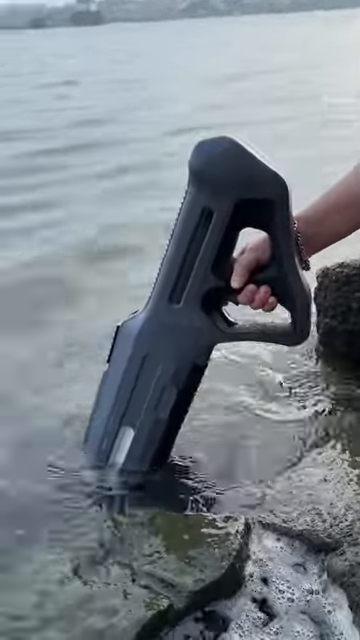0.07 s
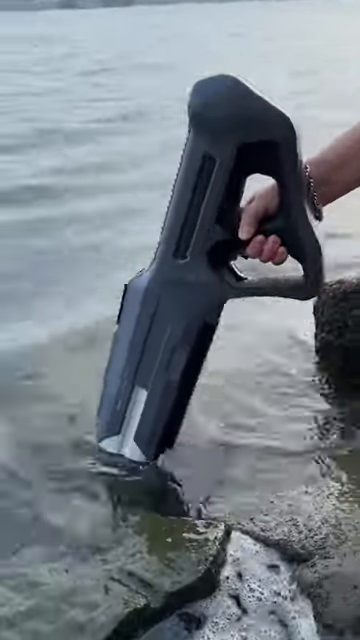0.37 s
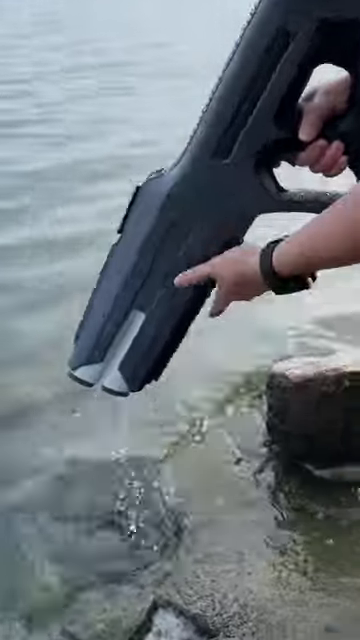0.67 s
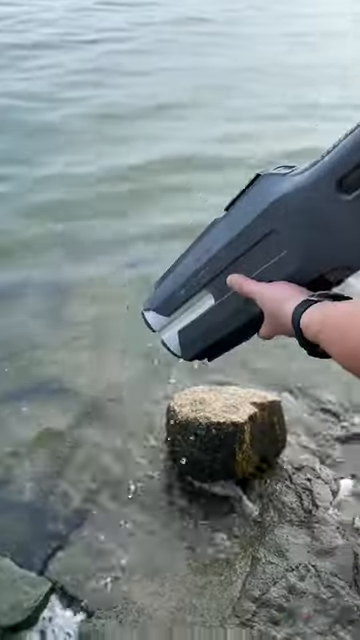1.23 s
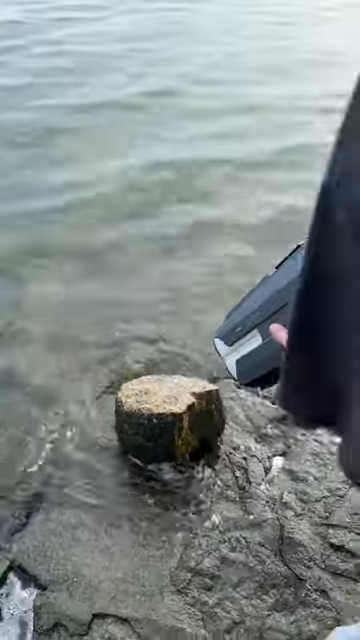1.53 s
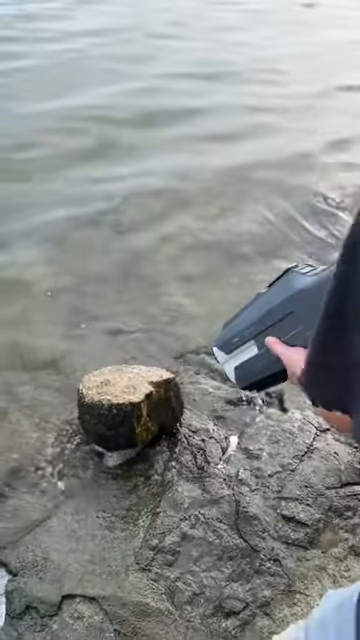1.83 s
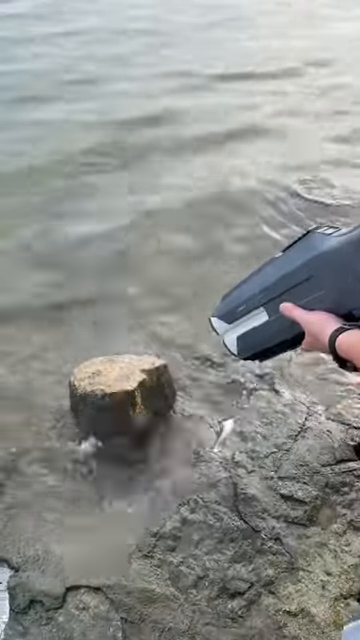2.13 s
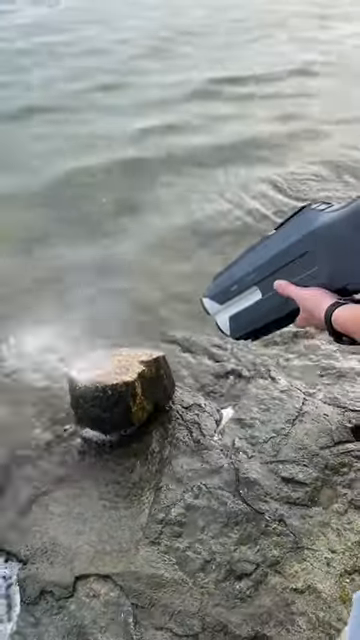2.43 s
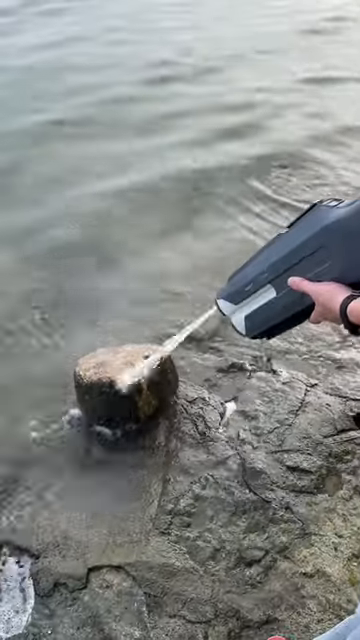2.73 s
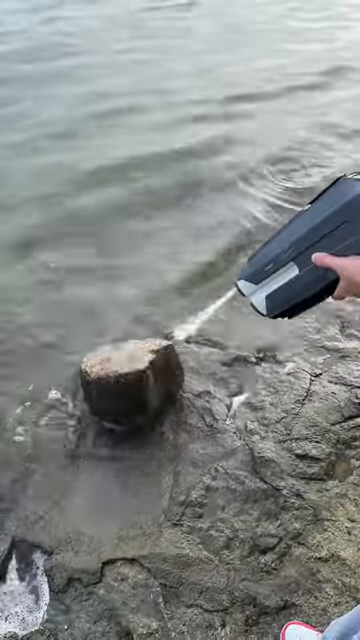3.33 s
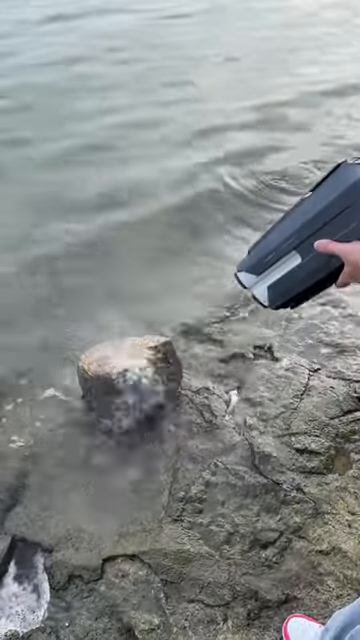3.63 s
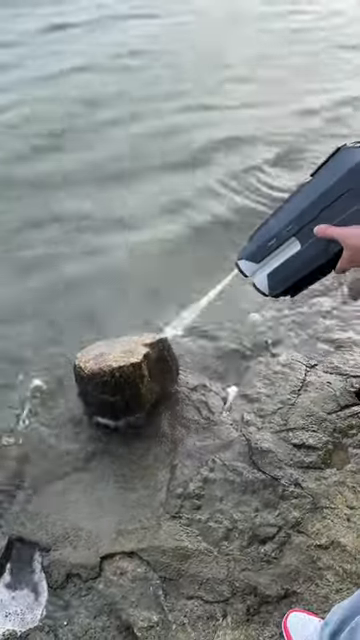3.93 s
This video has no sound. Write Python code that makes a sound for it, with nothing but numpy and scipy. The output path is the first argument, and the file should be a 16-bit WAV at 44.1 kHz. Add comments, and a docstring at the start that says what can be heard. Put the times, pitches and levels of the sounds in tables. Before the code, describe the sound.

A motorised toy water gun fires a rapid run of hollow plastic knocks and hissing jets that spatter on stone. Before that, it drips and gurgles out of a lake. Small waves lap and wind rumbles on the close microphone.

```python
"""A motorised toy water gun fires 17 quick shots at a rock, after being lifted dripping out of a lake.
In each shot the piston knocks twice in the hollow plastic body, a jet hisses and spatters on stone,
and the piston returns with a duller thud. Thrown water plops into the shallows.
All along, small waves full of bubbles lap and a breeze rumbles on the microphone."""
import sys
import numpy as np
from scipy import signal
from scipy.fft import rfft, irfft
from scipy.io import wavfile
from scipy.ndimage import uniform_filter1d

SR = 44100
rng = np.random.default_rng(int(sys.argv[2]) if len(sys.argv) > 2 else 0)


def store_pcm(level_fs):
    """Save levels as 16-bit WAV."""
    pcm = np.round(np.clip(level_fs, -1, 1) * 32767).astype(np.int16)
    wavfile.write(sys.argv[1], SR, np.atleast_2d(pcm).T)


N = 176400
CLOCK = np.arange(N) / SR  # seconds into the scene
T = np.arange(SR // 3) / SR  # seconds into one event


def amp(db):
    """Turns decibels into a gain."""
    return 10 ** (np.asarray(db) / 20)


def unit(x):
    """Scales a signal to an average power of 1."""
    return x / np.sqrt(np.mean(x ** 2) + 1e-20)


def read(points, hz):
    """Looks up a table along a log frequency scale."""
    f, value = np.transpose(points)
    return np.interp(np.log(hz + 1), np.log(f + 1), value)


def fall(t, t60, hold_s=0):
    """Silent before t = 0, steady for hold_s, then fading by 60 dB every t60 seconds."""
    return (t >= 0) * np.exp(-np.log(1000) * np.maximum(t - hold_s, 0) / t60)


def rise(seconds):
    """Fades an event in along a straight line."""
    return np.minimum(T / seconds, 1)


def add(mix, s, sound):
    """Mixes a sound in, starting at s seconds."""
    part = mix[..., round(s * SR):][..., :sound.shape[-1]]
    part += sound[..., :part.shape[-1]]


def noise(size=N):
    """White noise for two channels."""
    return rng.standard_normal((2, size))


def colour(x, spectrum):
    """Gives a sound the tone colour in a table; white noise keeps its power."""
    gain = unit(amp(read(spectrum, abs(np.fft.fftfreq(4096, 1 / SR)))))
    taps = np.fft.ifft(np.exp(np.conj(signal.hilbert(np.log(gain))))).real[:2048]  # rings only afterwards
    return signal.oaconvolve(x, taps[None], axes=1)[:, :N]


def drops(per_s, spread_db):
    """Tiny drops land as random clicks; spread_db makes their sizes uneven."""
    sizes = amp(spread_db * np.minimum(rng.exponential(1, (2, N)), 4))
    return unit(np.sign(noise()) * sizes * (rng.random((2, N)) < per_s / SR))


def patchy(x, depth_db, width_hz, length_s):
    """Lets random bands of a sound swell and fade."""
    hz, t, spectra = signal.stft(x, SR, nperseg=512, noverlap=384)
    across = np.fft.fftfreq(len(hz), hz[1])[:, None] * width_hz
    along = np.fft.fftfreq(len(t), t[1]) * length_s
    blur = np.exp(-2 * (across ** 2 + along ** 2))
    patches = unit(np.fft.ifft2(np.fft.fft2(rng.standard_normal(spectra.shape[1:])) * blur).real)
    return unit(signal.istft(spectra * amp(depth_db * patches), SR, nperseg=512, noverlap=384)[1][:, :N])


def bubble_tone(hz, t, glide_per_s):
    """A bubble's note, climbing by glide_per_s times its starting pitch each second."""
    return np.sin(2 * np.pi * hz * t * (1 + glide_per_s * t / 2))


# How loud the water is: t/s, lapping level/dB, trickle level/dB
WATER_LEVELS = [(0.0, -31, -49), (0.17, -41, -70), (0.406, -44, -57.5), (0.704, -38, -48),
                (0.798, -38.5, -58), (0.864, -33.5, -37), (0.9, -30, -31.5), (0.926, -31.5, -43),
                (1.4, -43.5, -46), (1.654, -41, -48.5), (1.694, -43, -40.5), (1.85, -34, -45.5)]
# Tone colour of lapping water: f/Hz, level/dB
LAP_COLOUR = [(60, -39.5), (230, -53), (400, -3), (600, -3.5), (950, -2.5), (1500, -5.5), (2100, -13.5),
              (4000, -18), (9000, -23.5), (15000, -36)]
# Tone colour of trickling water: f/Hz, level/dB
TRICKLE_COLOUR = [(150, -47), (500, -11), (2000, -10), (3500, 0), (6500, -3.5), (9000, 2.5), (11000, -5),
                  (14500, -1)]


def waves_and_trickle(bubbles_per_s=700, ring_cycles=6.5, gain_db=-1.5):
    """Small waves fizz with ringing bubbles while a fine trickle runs off the gun."""
    bubbles = np.zeros((2, N))
    t = T[:len(T) // 8]
    for when, pitch, size, pan in rng.random((int(bubbles_per_s * N / SR), 4)):
        hz = 350 + 2600 * pitch
        fade = np.exp(-t * hz / ring_cycles) * (1 - t / t[-1])
        bubble = amp(8.5 * size ** 2) * fade * bubble_tone(hz, t, glide_per_s=7)
        add(bubbles, when * N / SR, np.array([[pan], [1 - pan]]) * bubble)
    lap = unit(colour(unit(bubbles) + amp(6) * noise(), LAP_COLOUR))
    droplets = patchy(drops(per_s=160, spread_db=3), depth_db=3, width_hz=1400, length_s=0.0072)
    trickle = colour(droplets + amp(-6.5) * noise(), TRICKLE_COLOUR)
    s, lap_db, trickle_db = np.transpose(WATER_LEVELS)
    lap *= amp(np.interp(CLOCK, s, lap_db))
    trickle *= amp(np.interp(CLOCK, s, trickle_db))
    return amp(gain_db) * (lap + trickle)


# Gusts of the breeze: t/s, level/dB, wind filter cut-off f/Hz
GUSTS = [(0, -37, 124), (.3, -36, 112), (.55, -36.5, 98), (.9, -36, 129), (1.2, -36, 144),
         (1.3, -32.5, 156), (1.38, -42, 259), (1.6, -37, 297), (1.71, -37, 436), (1.86, -40.5, 437),
         (1.95, -33, 273), (2.15, -34, 262), (2.4, -23.5, 204), (2.9, -33, 255), (3.25, -26, 153),
         (3.6, -28.5, 201), (3.85, -17.5, 191), (4, -18, 174)]


def breeze(top_ratio=2.24, lump_db=3.5):
    """Lumpy wind rumble, its bass cut by the recorder's moving wind filter."""
    hz, t, spectra = signal.stft(noise(), SR, nperseg=2048, noverlap=1536)
    s, db, cutoff_hz = np.transpose(GUSTS)
    octaves = np.log2((hz[:, None] + 1) / np.interp(t, s, cutoff_hz))
    below_db = np.clip(72 * octaves, -34, 0)  # a steep cut that leaves a little deep bass
    above_db = -12.5 * np.maximum(octaves - np.log2(top_ratio), 0)
    gain = amp(below_db + above_db)
    gain /= np.linalg.norm(gain, axis=0)
    rumble = signal.istft(spectra * gain, SR, nperseg=2048, noverlap=1536)[1][:, :N]
    lumps = unit(uniform_filter1d(uniform_filter1d(noise()[0], size=900), size=600))
    return unit(rumble * amp(lump_db * lumps)) * amp(np.interp(CLOCK, s, db))


WATER_RISE_S = 0.0017
# Single bubbles: t/s, level/dB, starting f/Hz, fade time/s
GULP_BUBBLES = [(.219, -27, 232, 0.094), (.52, -21, 180, 0.066), (.772, -23, 600, 0.081),
                (0.832, -24.5, 2030, 0.024), (.898, -13, 389, 0.036), (0.899, -38, 914, .04),
                (1.008, -25, 894, 0.045), (1.092, -21, 258, 0.052), (1.115, -18, 333, 0.034),
                (1.175, -16, 263, .05), (1.268, -19, 320, 0.039), (1.278, -23.5, 515, .04),
                (1.695, -47, 486, .05), (1.803, -31, 536, 0.15), (1.86, -19.5, 1450, 0.023)]


def gulps():
    """Bubbles gulp with a rising note as the gun leaves the water."""
    out = np.zeros((2, N))
    for s, db, hz, t60 in GULP_BUBBLES:
        shape = rise(WATER_RISE_S) * fall(T, t60, hold_s=WATER_RISE_S)
        add(out, s, amp(db) * shape * bubble_tone(hz, T, glide_per_s=3.5))
    return out


# Drips off the gun: t/s, level/dB, f/Hz
GUN_DRIPS = [(0.259, -39, 3560), (.5237, -28.5, 3370), (0.6536, -30, 3260), (.6878, -34, 8860),
             (0.8952, -18.5, 2520), (1.0091, -27.5, 9150), (1.2241, -26.5, 3940), (1.281, -43, 2980),
             (1.3245, -20.5, 8260), (1.3456, -33, 8000), (1.4114, -25.5, 7860), (1.478, -23.5, 5650),
             (1.6213, -36, 7100), (1.6413, -29, 8550), (1.785, -25.5, 4070)]


def drips():
    """Each drip hits stone or water with a tiny ping and a noisy tick."""
    pings, ticks = np.zeros((2, N)), np.zeros(N)
    for s, db, hz in GUN_DRIPS:
        add(pings, s, amp(db - 3.5) * fall(T, t60=0.012) * np.sin(2 * np.pi * hz * T))
        add(ticks, s, amp(db - 6) * fall(T, t60=0.024))
    return pings + colour(ticks * noise(), TRICKLE_COLOUR)


# Sloshes and scuffs: t/s, level/dB, fade time/s
HANDLING = [(.897, -21, 0.031), (1.69, -25.5, 0.14), (1.862, -28.5, 0.087), (1.881, -22, 0.021)]


def scuffs():
    """The wet gun shifts in the hands with short puffs of noise."""
    puffs = np.zeros(N)
    for s, db, t60 in HANDLING:
        add(puffs, s, amp(db) * rise(WATER_RISE_S) * fall(T, t60, hold_s=WATER_RISE_S))
    return colour(puffs * noise(), LAP_COLOUR)


RELEASE, SLAM, RETURN = range(3)  # the piston's three blows
# Notes of the plastic body: f/Hz, fade time/s, then level/dB at release, slam and return
BODY_NOTES = [(552, 0.059, -41, -49, -9.5), (820, 0.023, -18, -20, -9), (990, 0.038, -18, -16, -22),
              (1394, 0.054, -19, -14.5, -26), (1523, 0.023, -31, -6.5, -20), (1765, 0.033, -25.5, -15, -27),
              (2211, 0.012, -17.5, -36.5, -10.5), (2650, 0.044, -20, -32, -48),
              (3986, 0.015, -13.5, -16, -13)]


def body_ring(blow, detune=0.027, spread_rad=0.76):
    """A blow sets the hollow body ringing, tuned a little differently each time."""
    out = np.zeros((2, len(T)))
    for hz, t60, *levels_db in BODY_NOTES:
        tune, side = rng.standard_normal(2)
        phase = 2 * np.pi * hz * (1 + detune * tune) * T + spread_rad * side * np.array([[1], [-1]])
        out += rng.choice([-1, 1]) * amp(levels_db[blow]) * fall(T, t60) * np.sin(phase)
    return out


def chamber_thump(hz, wobble=0.098, wobble_s=0.002, settle_s=0.0016):
    """The water chamber booms, settling in pitch and wobbling as the water inside shifts."""
    pitch_wobble, level_wobble = wobble * unit(uniform_filter1d(noise(len(T)), int(wobble_s * SR)))
    pitch_hz = hz * (1 + 0.21 * np.exp(-T / settle_s) + pitch_wobble / 2)
    shape = rise(0.0012) * fall(T, t60=0.045, hold_s=0.0079)
    return (1 + level_wobble) * shape * np.sin(2 * np.pi * np.cumsum(pitch_hz) / SR)


# Piston strokes: t/s, knock level/dB, thump level/dB, thump f/Hz, return delay/s, return level/dB
STROKES = [(1.8865, 2, -1, 460, 0.058, 3), (2.0782, 3, 0, 458, 0.062, 1.5), (2.2402, 0.5, -6, 447, .062, 4),
           (2.3814, 2, -0.5, 448, 0.06, 1.5), (2.5125, 3, -3, 455, .062, 2),
           (2.6336, 0, -5.5, 459, 0.077, 9), (2.7452, 1.5, -4, 465, 0.059, 2.5),
           (2.8658, 1.5, -4, 467.4, .062, 4), (2.9873, 0.5, -3, 460.2, 0.065, -2.5),
           (3.1190, -1.5, -9.5, 450, 0.064, 2.5), (3.2297, -0.5, -2, 457.5, .063, 3.5),
           (3.3616, 1, 1, 466, .063, 8), (3.4723, -0.5, 0.5, 452, .063, -5),
           (3.5935, 8, 6.5, 471, 0.064, 1), (3.7257, -0.5, 3, 461, .063, 3),
           (3.836, 1, 5, 465, 0.063, 10.5), (3.9575, -5, 1, 467, 0.085, -14)]
# Tone colour of each crack, plus a faint deep bump from the recorder's limiter: f/Hz, level/dB
CRACK_COLOUR = [(30, -7), (150, -52), (400, 7), (1400, 1), (2500, 0), (4200, -0.5), (6000, -5.5),
                (9000, -2.5), (11500, -8), (15000, -3.5)]


def piston(slam_s=0.0063, slide_s=0.0089):
    """The catch lets go, the piston slams into its stop, then returns: each blow cracks and rings."""
    body, crack = np.zeros((2, N)), np.zeros(N)
    for s, knock_db, thump_db, hz, back_s, back_db in STROKES:
        add(body, s, amp(knock_db) * body_ring(RELEASE))
        add(body, s + slam_s, amp(knock_db) * body_ring(SLAM))
        add(body, s + slam_s, amp(thump_db - 7.5) * chamber_thump(hz))
        add(body, s + back_s, amp(back_db) * body_ring(RETURN))
        release = amp(-10) * fall(T, t60=0.026)
        slam = amp(-9.5) * fall(T - slam_s, t60=0.041)
        add(crack, s, amp(knock_db) * np.hypot(release, slam))
        slide_back = np.exp(np.minimum(T - back_s, 0) / slide_s) * fall(T, t60=0.075, hold_s=back_s)
        add(crack, s, amp(back_db - 12.5) * slide_back)
    return body + colour(crack * noise(), CRACK_COLOUR)


def shell(x, low_hz=227, bass_db=-18):
    """The small plastic shell gives off little bass."""
    return signal.sosfilt(signal.butter(2, low_hz, "high", fs=SR, output="sos"), x) + amp(bass_db) * x


# Jets leaving the nozzle: t/s, level/dB
SQUIRTS = [(1.9207, 3.5), (2.1148, 1), (2.2788, 0), (2.4225, -1), (2.5525, -1.5), (2.6732, 1.5),
           (2.7868, 0), (2.9072, 0.5), (3.027, 0), (3.1612, 2), (3.271, 1), (3.4033, -8.5), (3.5122, -0.5),
           (3.6341, 1.5), (3.7678, 0.5), (3.879, -2), (3.9978, -4)]
# Tone colour of jet and spray: f/Hz, level/dB
JET_COLOUR = [(100, -31.5), (400, 0.5), (900, -11.5), (2000, -5), (3000, -4.5), (4000, -1.5), (6000, -1),
              (8000, 2), (9600, 5), (10800, -1), (12000, -1.5), (13300, 0.5), (15500, 2.5)]


def jets(spit_db=2, spit_s=0.0033, sag_db_per_s=33):
    """Each jet starts with a spit, hisses while the pressure lasts, and leaves falling spray."""
    stream, spray = np.zeros(N), np.zeros(N)
    for s, db in SQUIRTS:
        pressure = amp(spit_db * np.exp(-T / spit_s) - sag_db_per_s * T)
        add(stream, s, amp(db - 11.5) * pressure * fall(T, t60=0.078, hold_s=0.049))
        shower = amp(-29.5) * fall(T, t60=0.13, hold_s=0.08)
        last_drops = amp(-40) * fall(T, t60=0.95, hold_s=0.08)
        add(spray, s, amp(db) * rise(0.013) * (shower + last_drops))
    wander = dict(depth_db=3.5, width_hz=300, length_s=0.073)  # the tone shifts as the jet roams the stone
    hiss = patchy(noise() + 2.3 * drops(per_s=7000, spread_db=-0.5), **wander)
    spatter = patchy(drops(per_s=2500, spread_db=3), **wander)
    return colour(stream * hiss + spray * spatter, JET_COLOUR)


def splats(centre_hz=2380, width_hz=120, peak_s=0.031, swell_s=0.014):
    """Each jet briefly sounds a pocket of air on the wet stone, at its own pitch."""
    out = np.zeros((2, N))
    swell = np.exp(-((T - peak_s) / swell_s) ** 2)
    for s, db in SQUIRTS:
        hz = centre_hz * np.exp(0.12 * rng.uniform(-1.03, 1))
        pocket = signal.iirpeak(hz, hz / width_hz, fs=SR)
        add(out, s, amp(db - 35) * swell * unit(signal.lfilter(*pocket, noise(len(T)))))
    return out


def plops(per_shot=7, low_hz=267.4, octaves=1.03, delay_s=0.091, span_s=0.12):
    """Water thrown off the rock lands in the shallows and makes low bubbles."""
    out = np.zeros((2, N))
    shape = rise(WATER_RISE_S) * fall(T, t60=0.085)
    for s, *_ in STROKES:
        for when, pitch, size, pan in rng.random((per_shot, 4)):
            hz = low_hz * 2 ** (octaves * pitch)
            bubble = amp(-27.5 + 10 * size) * shape * bubble_tone(hz, T, glide_per_s=7)
            add(out, s + delay_s + span_s * when, np.array([[pan], [1 - pan]]) * bubble)
    return out


def scene():
    """The gun and its faint echo off the rocks, over water and breeze."""
    background = waves_and_trickle() + breeze()
    gun = shell(gulps() + drips() + scuffs() + piston()) + jets() + splats()
    tail = noise(len(T)) * fall(T - 0.004, t60=0.037)
    echo = signal.oaconvolve(gun, tail / np.linalg.norm(tail[0]), axes=1)[:, :N]
    return background + gun + amp(-13) * echo + plops()


def limiter(x, threshold_db=-14, share_removed=0.48, recover_db_per_s=184):
    """Turns the sound down quickly on loud knocks, then lets it come back."""
    power_db = 10 * np.log10(abs(uniform_filter1d((x ** 2).mean(0), size=180)) + 1e-12)
    recovery_db = recover_db_per_s * CLOCK
    held_db = np.maximum.accumulate(power_db + recovery_db) - recovery_db
    excess_db = uniform_filter1d(np.maximum(held_db - threshold_db, 0), size=60)
    return x * amp(-share_removed * excess_db)


# How alike the left and right microphones sound: f/Hz, likeness from 0 to 1
MIC_LIKENESS = [(100, .85), (500, .78), (1200, .48), (2500, .45), (4200, .45), (5500, .25), (7000, .4),
                (8500, .65), (9800, .75), (10600, .998), (12000, .998), (12600, .7), (13400, .95),
                (16000, .95)]
# How far the left one runs ahead of the right: f/Hz, phase/rad
LEFT_LEAD = [(100, .1), (500, .4), (900, -.2), (1300, .8), (2000, .6), (6200, .9), (7300, 1.8), (8000, -.2),
             (9000, -.8), (9900, -1.7), (10700, -3.1), (11900, -3.1), (12600, -1.1), (13300, 0), (16000, 0)]


def record(dry, top_hz=15850):
    """Two close microphones share much of the sound; peaks are softened and the top treble is cut."""
    hz = np.fft.rfftfreq(N, 1 / SR)
    left, right = rfft(dry)
    likeness = read(MIC_LIKENESS, hz)
    mid = (left + right) / 2 * np.sqrt(1 + likeness)
    side = (left - right) / 2 * np.sqrt(1 - likeness)
    turn = np.exp(0.5j * read(LEFT_LEAD, hz))
    pair = irfft(np.array([(mid + side) * turn, (mid - side) / turn]), N)
    ducked = limiter(pair)
    rounded = ducked / (1 + ducked ** 4) ** (1 / 4)  # gentle overload
    lowpass = signal.firwin(301, top_hz, window=("kaiser", 8), fs=SR)
    return signal.oaconvolve(rounded, lowpass[None], "same")


dry = scene()
out = record(dry)
store_pcm(out)
```